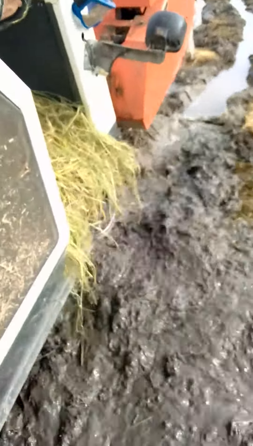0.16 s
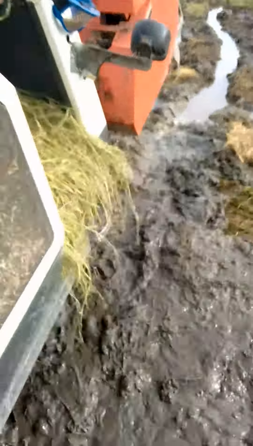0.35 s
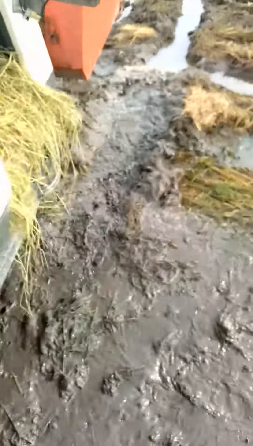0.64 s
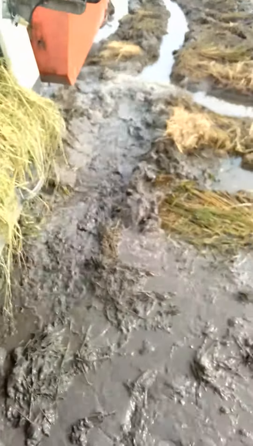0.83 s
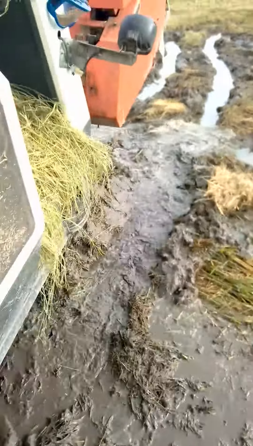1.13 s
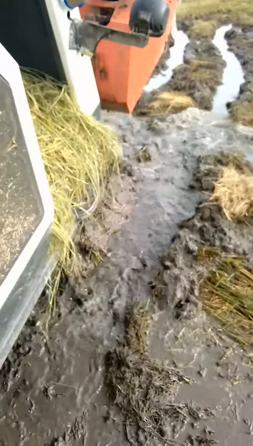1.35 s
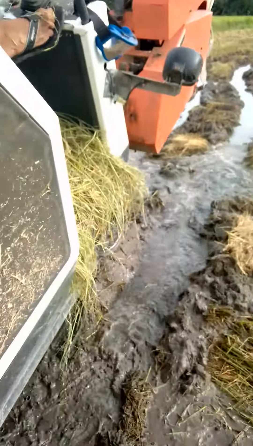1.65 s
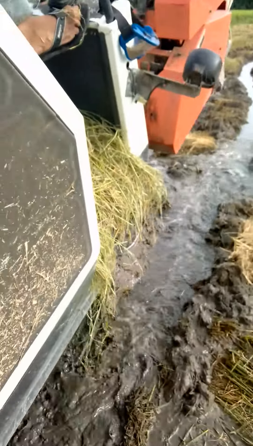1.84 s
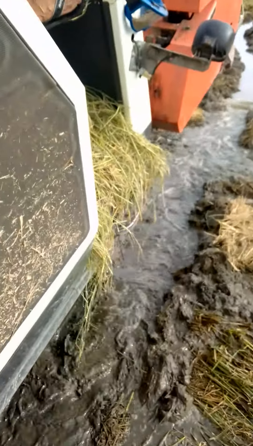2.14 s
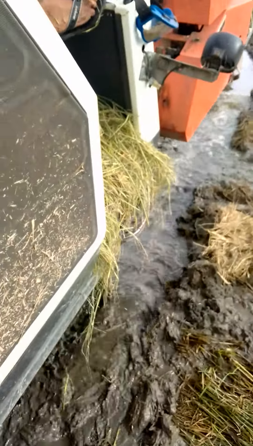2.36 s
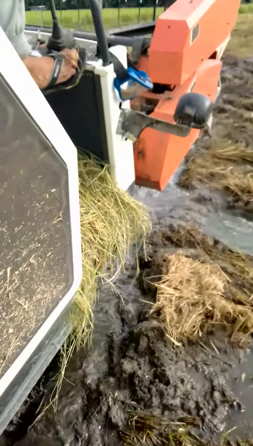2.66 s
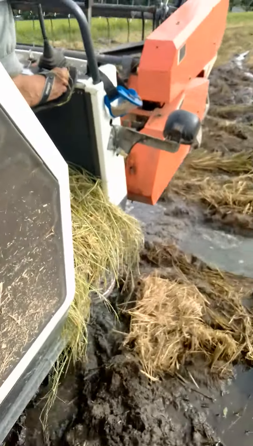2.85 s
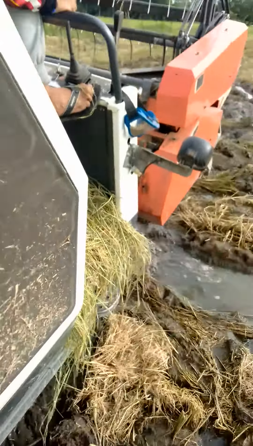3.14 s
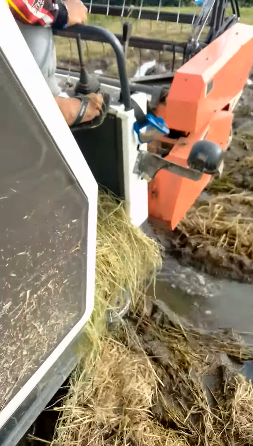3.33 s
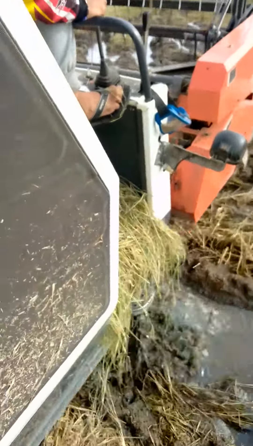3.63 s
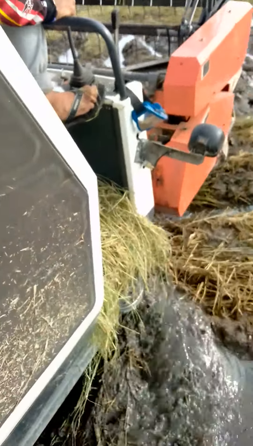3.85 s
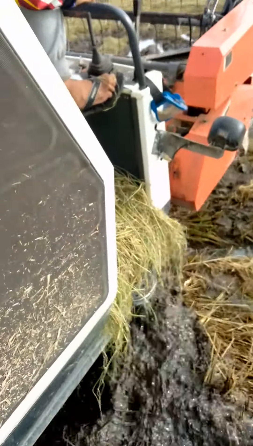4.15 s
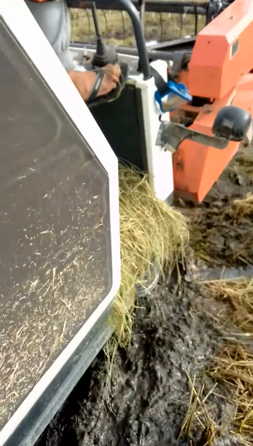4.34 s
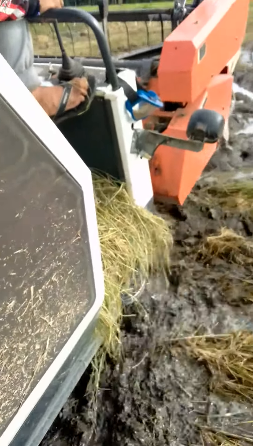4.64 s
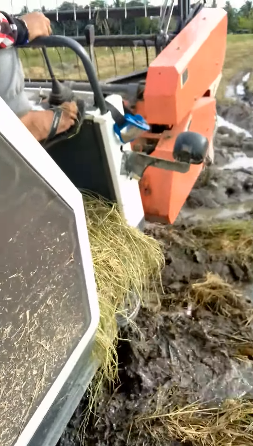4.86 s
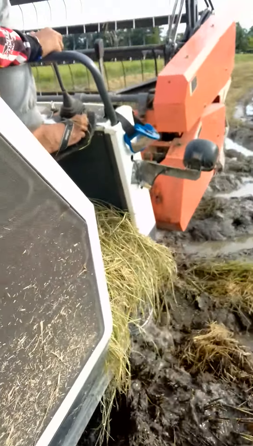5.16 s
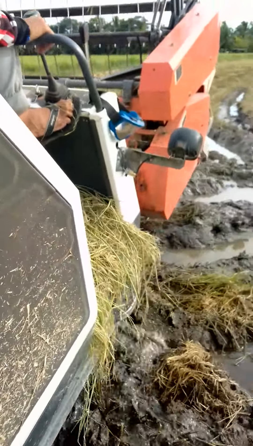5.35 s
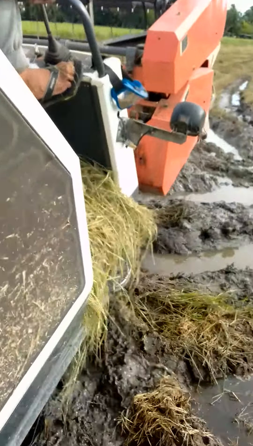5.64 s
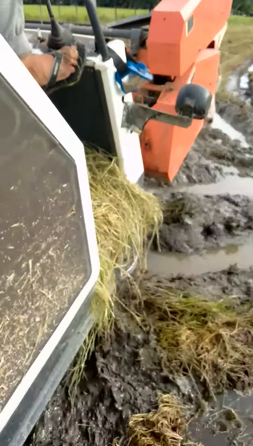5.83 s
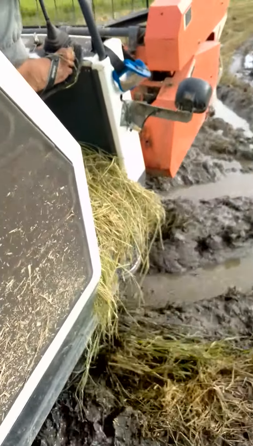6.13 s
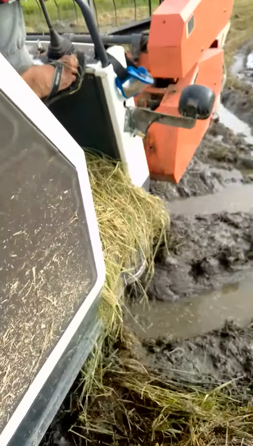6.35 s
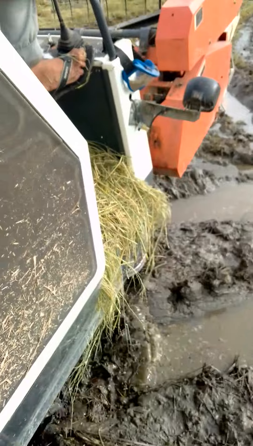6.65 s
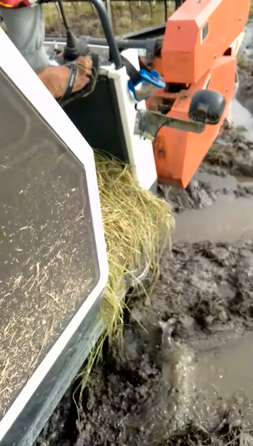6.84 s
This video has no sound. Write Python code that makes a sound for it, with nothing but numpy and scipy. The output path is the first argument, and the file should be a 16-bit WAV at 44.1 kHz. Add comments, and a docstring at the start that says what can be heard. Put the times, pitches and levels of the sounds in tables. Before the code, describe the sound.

Dull, steady drone of a harvester's diesel engine with a faint whine, two short bright rushes of roar and some handling thumps.

```python
"""Harvester on a hand-held phone

A four-cylinder diesel works at near-steady speed in a muddy field: exhaust beat, fan and drum roar,
and a pump's whine. A hand mostly covers the microphone port, so the machine comes dull through the
phone's case; when the grip slips, its full roar rushes in. Low rumble comes through the grip,
fingers bump the case, and brief squeezes duck the machine."""
import sys
import numpy as np
from scipy import signal
from scipy.fft import rfft, irfft, next_fast_len
from scipy.io import wavfile

SR = 44100
rng = np.random.default_rng(int(sys.argv[2]) if len(sys.argv) > 2 else 0)


def materialize(psi):
    """Save the field psi as 16-bit PCM at rate SR to the path in sys.argv[1].

    A 1-D psi becomes a single channel; in a 2-D psi each row is a channel.
    """
    bounded = np.clip(np.atleast_2d(psi).T, -1, 1)
    quanta = np.round(bounded * 32767).astype(np.int16)
    wavfile.write(sys.argv[1], SR, quanta)


N = 308259
FFT_SIZE = next_fast_len(N)
BIN_HZ = np.maximum(np.arange(FFT_SIZE // 2 + 1) * SR / FFT_SIZE, 1)


def from_db(db):
    """Gain of a level in dB."""
    return 10 ** (np.asarray(db) / 20)


def rms_one(x):
    """The signal scaled to rms 1."""
    return x / np.sqrt(np.mean(x ** 2) + 1e-20)


def automation(rows):
    """Breakpoint lanes drawn out to one value a sample."""
    times, *lanes = np.transpose(rows)
    return [np.interp(np.arange(N) / SR, times, lane) for lane in lanes]


def drift(rate_hz):
    """Slow random modulator of rms about 1: noise twice through a one-pole low-pass."""
    hop = 40
    pole = np.exp(-2 * np.pi * hop * rate_hz / SR)
    slow = signal.lfilter([1], [1, -2 * pole, pole * pole], rng.standard_normal(N // hop + 2002))[2000:]
    return np.interp(np.arange(N) / hop, np.arange(len(slow)), rms_one(slow))


def equalise(x, curve, peaks=()):
    """An EQ curve plus resonant peaks, with the result scaled to rms 1."""
    curve_hz, curve_db = np.transpose(curve)
    db = np.interp(np.log(BIN_HZ), np.log(curve_hz), curve_db)
    for hz, width_hz, boost_db in peaks:
        db = db + boost_db / (1 + (2 * (BIN_HZ - hz) / width_hz) ** 2)
    return rms_one(irfft(rfft(x, FFT_SIZE) * from_db(db), FFT_SIZE)[:N])


def tone(cycles, db, rough_db):
    """A sine whose strength wavers from stroke to stroke."""
    return np.sqrt(2) * from_db(db + rough_db * drift(14)) * np.cos(2 * np.pi * cycles)


# Engine pitch, sagging under load: t/s, firing rate/Hz
FIRING_RATE = [(0, 91.7), (.4, 91.8), (.8, 92.4), (1.2, 92.8), (2.4, 93.6), (3.2, 93.7), (4, 94.1),
               (4.4, 92.9), (4.8, 92.4), (5.2, 92.4), (6, 93.2), (7, 93.6)]
# Faders for the exhaust beat: t/s, firing tone level/dB, octave level/dB
EXHAUST_LEVELS = [(0, -56, -24), (.23, -26.5, -23.5), (.45, -14.5, -16), (.95, -18, -22), (1.4, -22.5, -25),
                  (1.9, -25.5, -24), (2.25, -26.5, -28.5), (2.5, -24.5, -19.5), (2.95, -25.5, -26),
                  (3.1, -28.5, -30), (3.55, -30, -37), (3.68, -45, -38.5), (4.12, -42.5, -44),
                  (4.3, -33, -30.5), (4.75, -25.5, -37), (5.3, -23.5, -33.5), (5.65, -29, -33),
                  (6.99, -36, -33.5)]


def exhaust_beat():
    """Firing tone and octave shake the phone's body directly; also returns the firing rate and count."""
    firing_hz, = automation(FIRING_RATE)
    firings = np.cumsum(firing_hz) / SR
    firing_db, octave_db = automation(EXHAUST_LEVELS)
    beat = tone(firings, firing_db, rough_db=1.64) + tone(2 * firings, octave_db, rough_db=0.66)
    return beat, firing_hz, firings


# Weak crank orders: multiple of the firing rate, level against the noise before EQ/dB
CRANK_ORDERS = [(1.5, -38.5), (3, -29.5), (3.5, -25), (4, -28.5), (5, -37), (6, -30), (7, -25.5), (10, -28),
                (12, -27)]
# Ring of the machine's casing: f/Hz, width/Hz, boost/dB
CASING_RESONANCES = [(347, 25.7, 8.5), (385, 20, -2.5), (458, 90, 0), (669.4, 27, 5), (1005, 42, 2),
                     (1170, 30, -2), (1390, 170, -1.5), (1673, 43, 4.5), (1780, 120, -2.5),
                     (1990, 130, 1.5), (2660, 220, 3), (2670, 280, -4), (3770, 200, 1.5), (4060, 120, 2)]
# Dull EQ, through hand and phone case: f/Hz, relative level/dB
MUFFLED_EQ = [(120, -14), (220, -12), (400, -11), (480, -18), (800, -20), (1350, -30.5), (2060, -26),
              (2500, -31), (2750, -40), (3350, -46), (3900, -44), (4400, -50), (5400, -57), (6600, -53),
              (8000, -58), (10500, -63), (15700, -67)]
# Fader for the dull layer: t/s, level/dB
MUFFLED_LEVEL = [(0, -39), (2.3, -40), (3.2, -38), (4.3, -40.5), (5.4, -38.5), (6.6, -37), (7, -39.5)]
# Bright EQ, with the port open: f/Hz, relative level/dB
ROAR_EQ = [(60, -43), (100, -12.5), (190, -7.5), (250, -14.5), (335, -11.5), (530, -17), (900, -12.5),
           (1200, -16.5), (2050, -9), (2550, -14.5), (3000, -20), (4100, -23), (6300, -42), (10000, -55.5),
           (15700, -66.5)]


def machine_roar(firings, damping_db):
    """Fan, drum and casing noise throbs with the crank, heard through the case and past the hand."""
    throb = 1 + 0.045 * np.cos(np.pi * firings) + 0.072 * np.cos(2 * np.pi * firings)
    source = throb * rng.standard_normal(N)
    source += sum(tone(order * firings + rng.random(), db, rough_db=2.5) for order, db in CRANK_ORDERS)
    muffled_db = automation(MUFFLED_LEVEL)[0] + 0.29 * drift(8.2)
    through_case = from_db(muffled_db) * equalise(source, MUFFLED_EQ, CASING_RESONANCES)
    at_port = from_db(-15) * equalise(source, ROAR_EQ, CASING_RESONANCES)
    return through_case + hand_on_port(at_port, damping_db)


# Whine partials: harmonic, level via case/dB, level at open port/dB, gain under load/dB, roughness/dB
PUMP_PARTIALS = [(1, -48, -32.5, -1, 2.0), (2, -62.5, -37, 10, 3.5)]


def pump_whine(firing_hz, damping_db):
    """The pump's pistons whine, sagging more than the engine; the octave sings under load."""
    free_firing_hz, free_pump_hz, slowest_pump_hz, sag_ratio = 93.6, 415, 403.5, 7.5
    load_onset_hz, load_span_hz = 93.1, .6
    piston_hz = np.maximum(free_pump_hz + sag_ratio * (firing_hz - free_firing_hz), slowest_pump_hz)
    strokes = np.cumsum(piston_hz) / SR
    load = np.clip((load_onset_hz - firing_hz) / load_span_hz, 0, 1)
    whine = 0
    for harmonic, case_db, open_db, load_db, rough_db in PUMP_PARTIALS:
        port_db = open_db - damping_at(damping_db, harmonic * free_pump_hz)
        whine += tone(harmonic * strokes, load_db * load, rough_db) * (from_db(case_db) + from_db(port_db))
    return whine


# Fader for the rumble: t/s, level/dB
RUMBLE_LEVEL = [(0, -13.5), (.5, -36.5), (1.2, -29), (1.9, -34.5), (3.2, -35), (3.9, -37), (5.3, -31.5),
                (6.5, -34.5), (7, -36)]
# Bass-heavy EQ: f/Hz, relative level/dB
RUMBLE_EQ = [(10, -30), (25, -11), (45, -1), (65, 0), (110, -3), (150, -7), (250, -16), (400, -40),
             (1200, -120)]


def grip_rumble():
    """Lumpy low noise comes through the grip."""
    level_db = automation(RUMBLE_LEVEL)[0] + .8 * drift(6)
    return from_db(level_db) * equalise(rng.standard_normal(N), RUMBLE_EQ)


# Resting hand on the port: t/s, cover (nominal treble cut)/dB
RESTING_GRIP = [(0, 32), (.4, 31.5), (1.25, 34.5), (1.75, 39.5), (2.36, 41), (2.68, 25), (2.76, 28.5),
                (3.12, 44), (3.25, 46)]
# Slips: t/s, attack/s, hold/s, release/s, cover at start of hold/dB, cover at end of hold/dB
GRIP_SLIPS = [(.002, 0.0087, 0.0031, 0.013, 15.5, 17), (.11, .022, 0.21, 0.029, 0, 7.4),
              (.2, .018, .008, .03, -3, .6), (.43, .12, .02, .08, 25, 26.3),
              (.665, 0.059, 0.011, 0.027, 26, 27), (1.3, 0.0035, 0.0036, 0.012, 26, 28),
              (2.413, .15, .075, 0.035, -2, 3.7), (2.732, 0.052, .17, .11, 2, 22.3)]
# The hand as a filter: f/Hz, cut at firm cover/dB, exponent of growth with cover, cupped-hand lift/dB
HAND_FILTER = [(300, 25.5, 3, 0), (730, 30, 1.95, 2), (1760, 39, 1.51, -0.3), (3770, 54.5, 1.06, 0.5),
               (7960, 32.5, 0.91, 0.1)]


def port_damping():
    """Cut in dB at each HAND_FILTER pitch: the grip, eased by slips that open fast and close steadily."""
    firm_db, ajar_db = 48, 11.5
    t = np.arange(N) / SR
    grip_db, = automation(RESTING_GRIP)
    cover_db = grip_db
    for start, attack, hold, release, first_db, last_db in GRIP_SLIPS:
        opening = np.sin(np.pi / 2 * np.clip((t - start) / attack, 0, 1))
        closing = np.clip((start + attack + hold + release - t) / release, 0, 1)
        slipped_db = np.interp(t, [start + attack, start + attack + hold], [first_db, last_db])
        cover_db = np.minimum(cover_db, grip_db + opening * closing * (slipped_db - grip_db))
    cover_db = np.maximum(cover_db, 0)
    cupping = cover_db / ajar_db * np.exp(1 - cover_db / ajar_db)  # strongest with the port ajar
    return np.array([cut_db * (cover_db / firm_db) ** exponent - lift_db * cupping
                     for _, cut_db, exponent, lift_db in HAND_FILTER])


def damping_at(damping_db, hz):
    """The hand's cut in dB over time at one pitch."""
    log_pitches = np.log(np.array(HAND_FILTER)[:, 0])
    weights = [np.interp(np.log(hz), log_pitches, row) for row in np.eye(len(HAND_FILTER))]
    return weights @ damping_db


def hand_on_port(x, damping_db):
    """The hand damps overlapping half-octave bands, which flicker a little, together and apart."""
    spectrum, shared_flicker = rfft(x, FFT_SIZE), drift(14)
    octaves = np.arange(7, 14.1, .5)  # 128 Hz to 16 kHz
    passed = 0
    for octave in octaves:
        band_shape = np.interp(np.log2(BIN_HZ), octaves, octaves == octave)
        band = irfft(spectrum * band_shape, FFT_SIZE)[:N]
        flicker_db = 0.79 * shared_flicker + 1.3 * drift(7.2)
        passed += band * from_db(flicker_db - damping_at(damping_db, 2 ** octave))
    return passed


# Handling hits: t/s, thump level/dB, f/Hz, 60 dB decay/s, click level/dB
FINGER_BUMPS = [(.007, 0, 112, 0.028, -46), (0.057, -6.5, 75, 0.046, -60), (0.089, -9, 60, 0.068, -60),
                (0.104, 0.5, 47.6, .09, -50), (0.982, 1.5, 106, 0.028, -45),
                (1.026, -5.5, 61.9, 0.084, -63), (1.103, -15.5, 70.45, 0.12, -69),
                (1.28, -1.5, 80, 0.029, -60), (1.303, 0, 52, 0.082, -26.5), (6.683, -22, 45, 0.3, -60)]


def finger_bumps():
    """A push briefly rings the case, its pitch falling as the contact spreads; a sharp one also clicks."""
    length = 8000
    track, t = np.zeros(N + length), np.arange(length) / SR
    for start, thump_db, hz, t60, click_db in FINGER_BUMPS:
        cycles = hz * t + 0.2 * (1 - np.exp(-t / 0.0027))
        attack = 1 - np.exp(-t / 0.00069)
        thump = from_db(thump_db - 60 * t / t60) * attack * np.sin(2 * np.pi * cycles)
        dull_noise = rms_one(signal.lfilter([1], [1, -1.76, .7744], rng.standard_normal(length)))
        click = from_db(click_db - 60 * t / 0.013) * dull_noise
        onset = round(start * SR)
        track[onset:onset + length] += thump + click
    return track[:N]


# Quick ducks: t/s, length/s, depth/dB
HAND_SQUEEZES = [(0.048, 0.078, 13.5), (1.259, 0.042, 9), (1.308, .06, 4.5)]


def hand_squeeze():
    """Gain that dips smoothly while the hand squeezes the port shut."""
    t = np.arange(N) / SR
    duck_db = sum(depth_db * np.sin(np.pi * np.clip((t - start) / length, 0, 1))
                  for start, length, depth_db in HAND_SQUEEZES)
    return from_db(-duck_db)


def scene():
    """Mono mix: squeezes duck the whole harvester, while rumble and bumps pass untouched."""
    damping_db = port_damping()
    beat, firing_hz, firings = exhaust_beat()
    harvester = beat + pump_whine(firing_hz, damping_db) + machine_roar(firings, damping_db)
    return (hand_squeeze() * harvester + grip_rumble() + finger_bumps())[None]


def record(dry):
    """The phone soft-clips the peaks and cuts the top with a steep low-pass."""
    ceiling, cutoff_hz = .72, 15700
    clipped = dry / (1 + np.abs(dry / ceiling) ** 6) ** (1 / 6)
    return signal.sosfilt(signal.ellip(12, .5, 70, cutoff_hz, fs=SR, output="sos"), clipped)


dry = scene()
out = record(dry)
materialize(out)
```